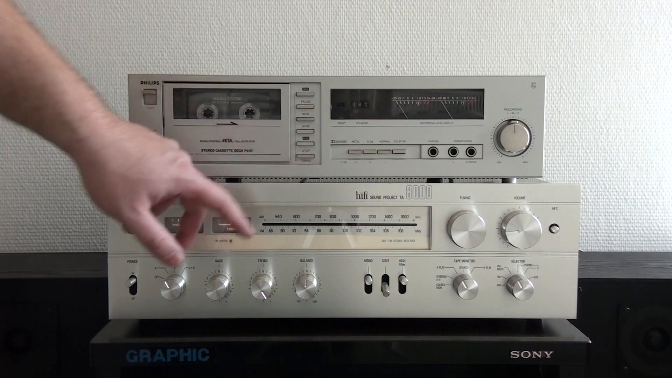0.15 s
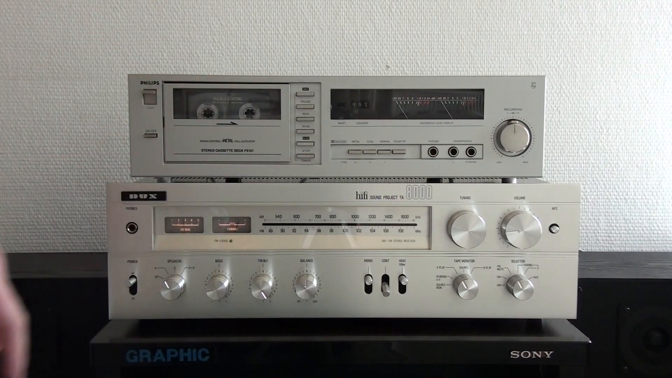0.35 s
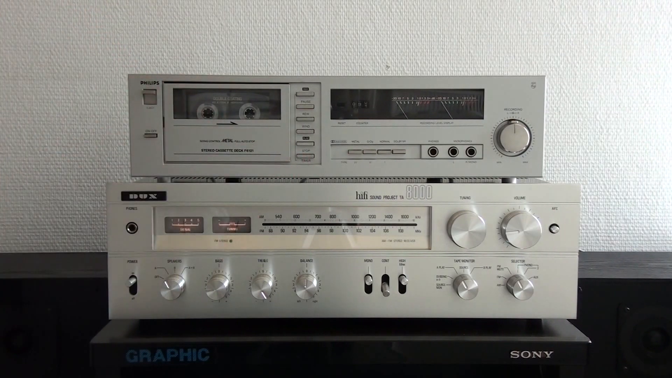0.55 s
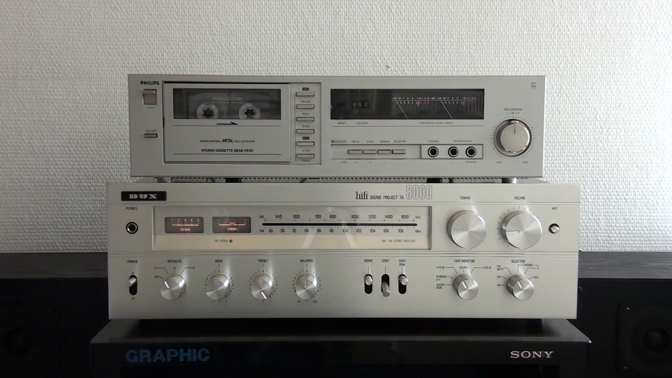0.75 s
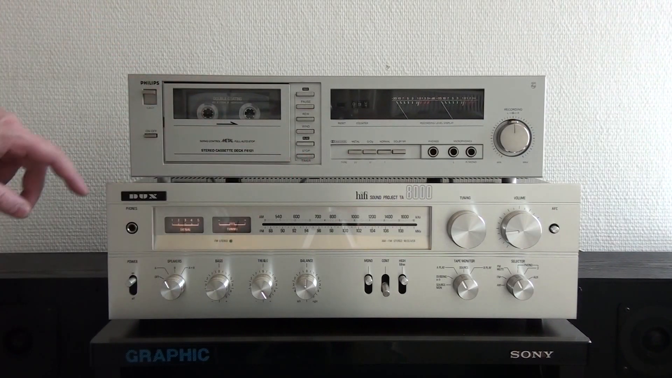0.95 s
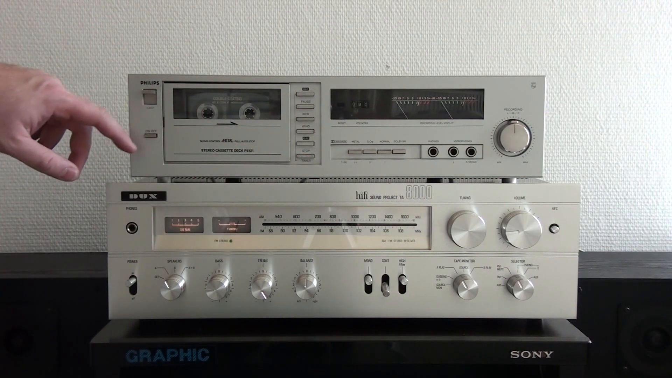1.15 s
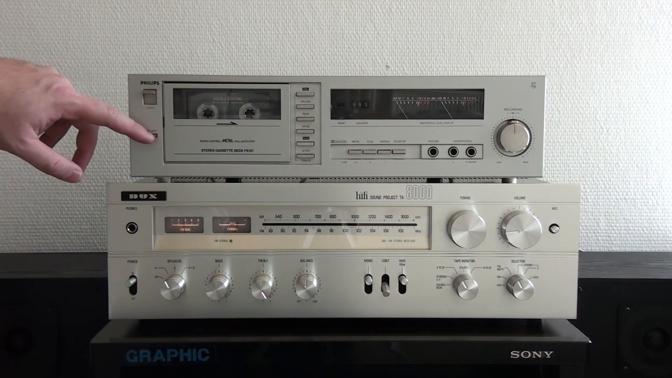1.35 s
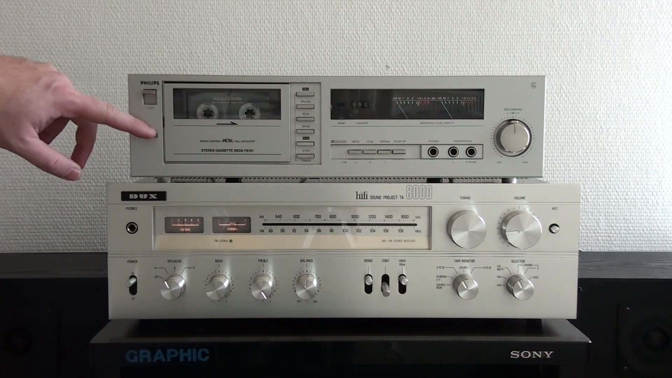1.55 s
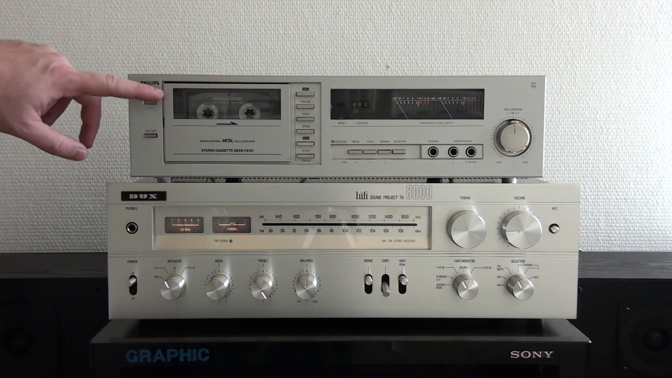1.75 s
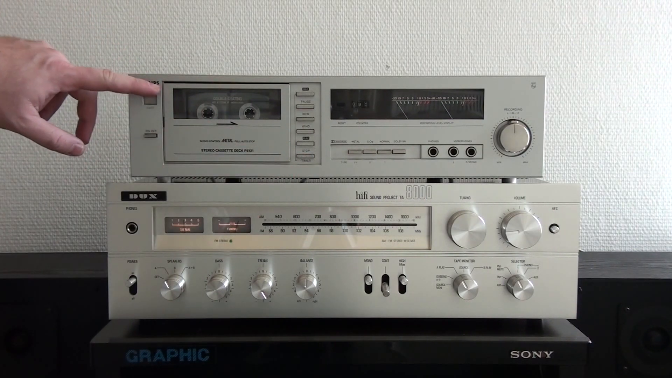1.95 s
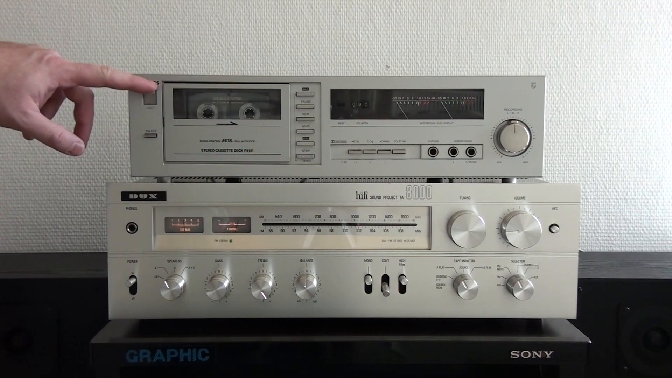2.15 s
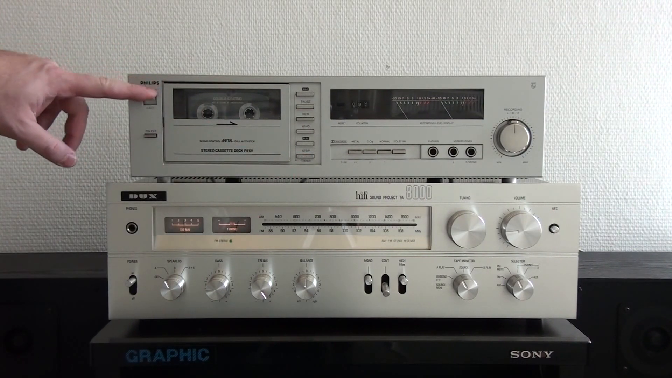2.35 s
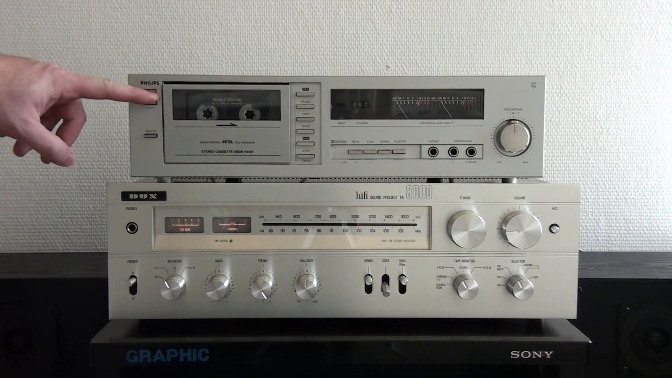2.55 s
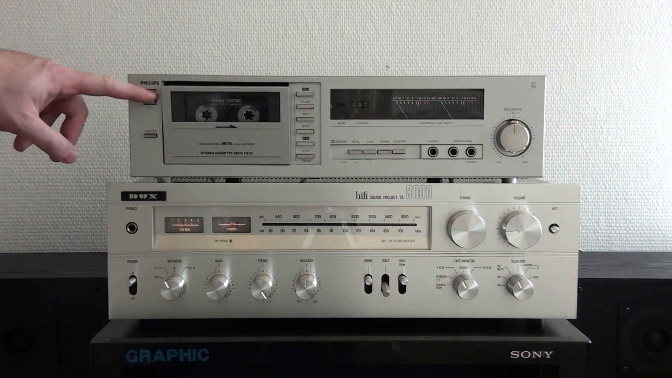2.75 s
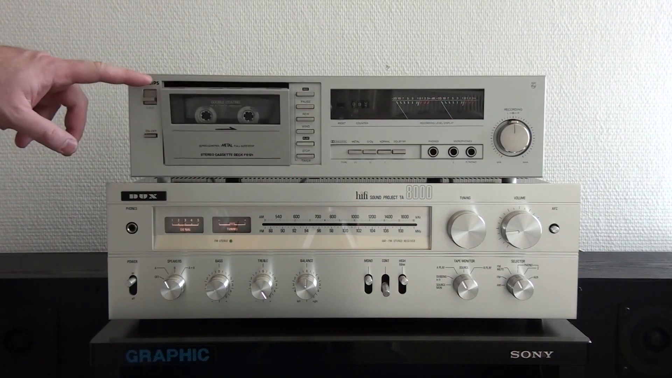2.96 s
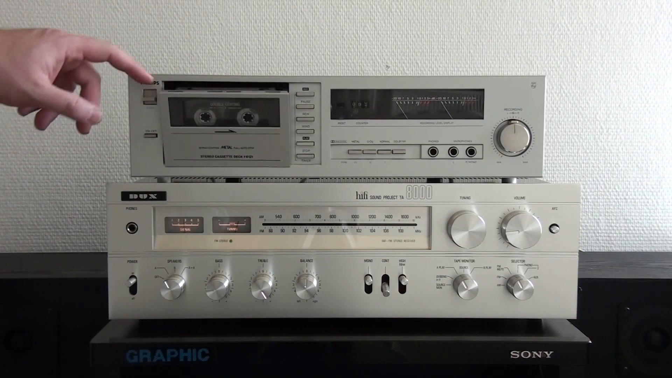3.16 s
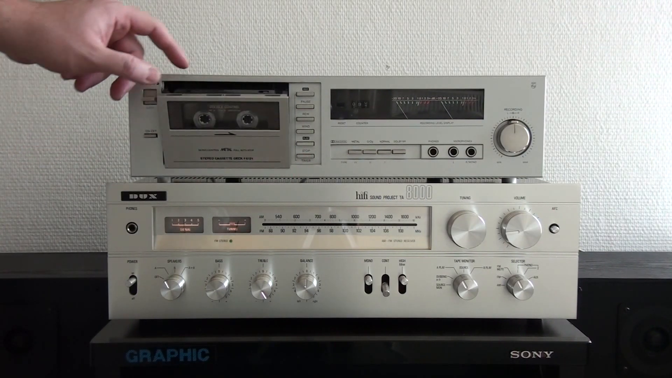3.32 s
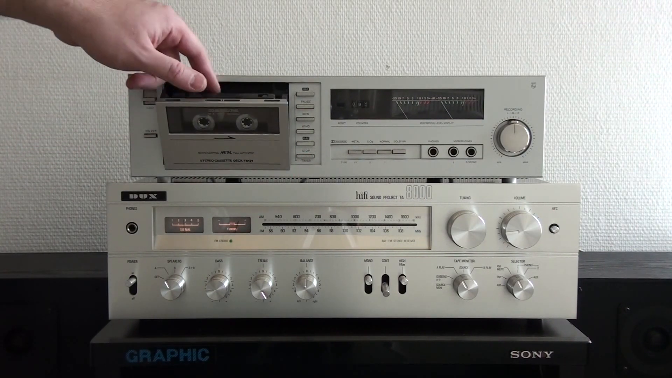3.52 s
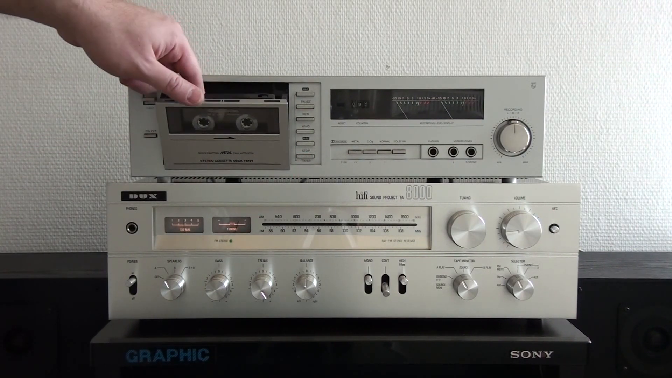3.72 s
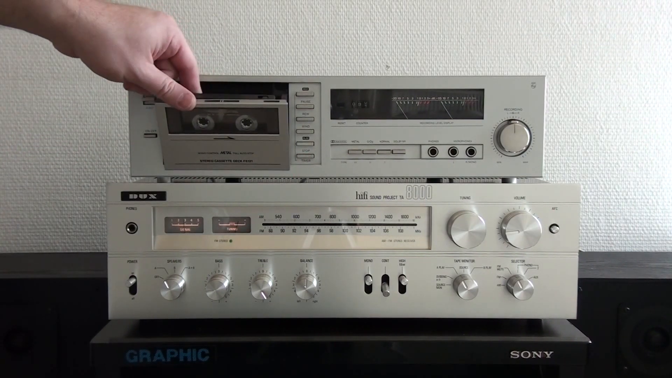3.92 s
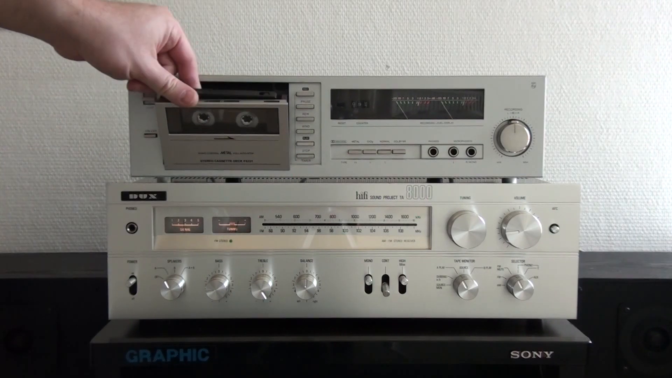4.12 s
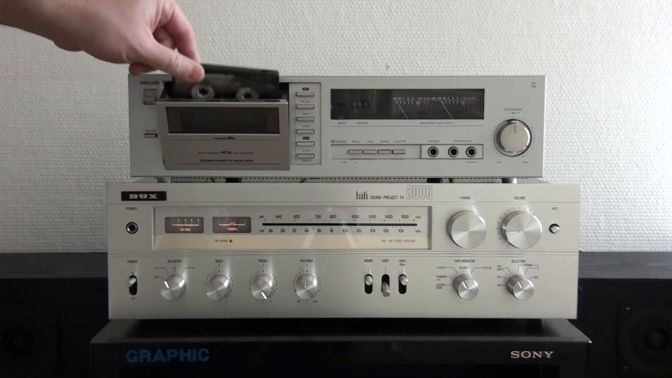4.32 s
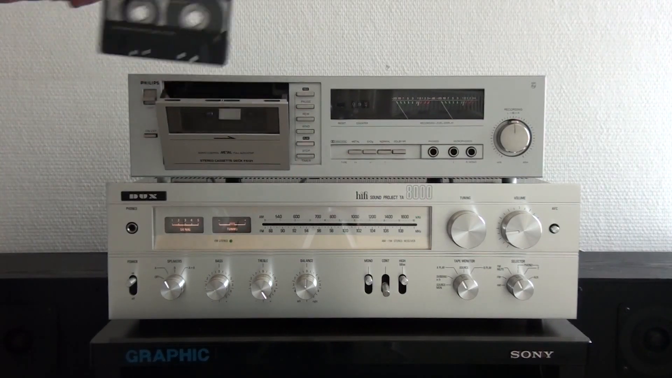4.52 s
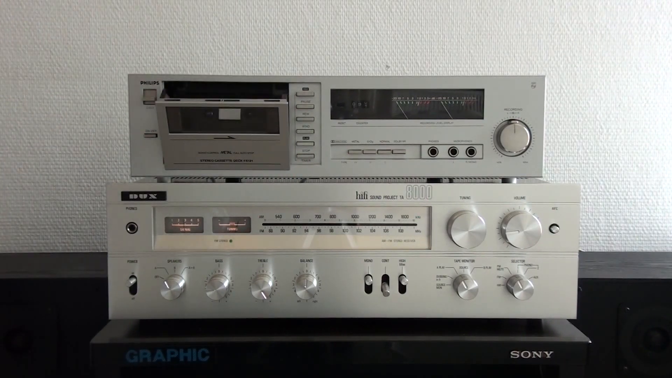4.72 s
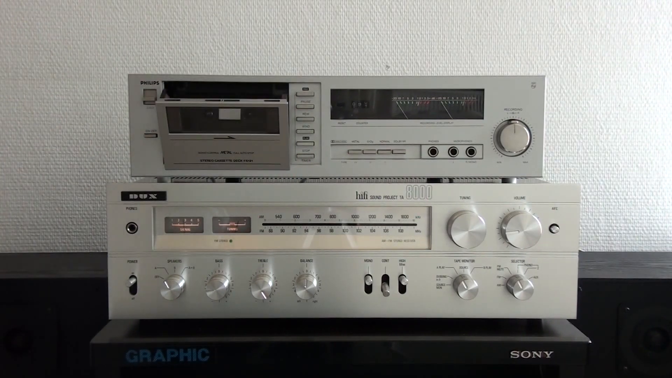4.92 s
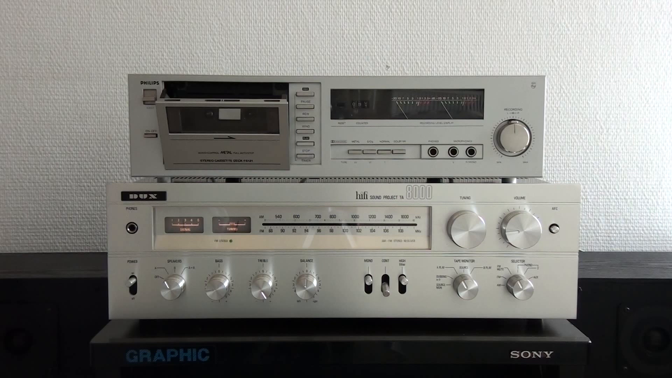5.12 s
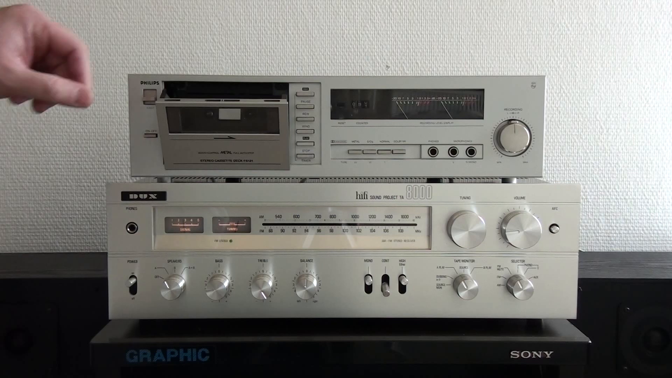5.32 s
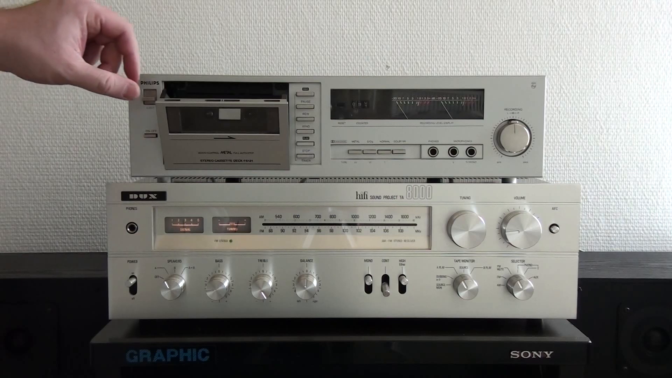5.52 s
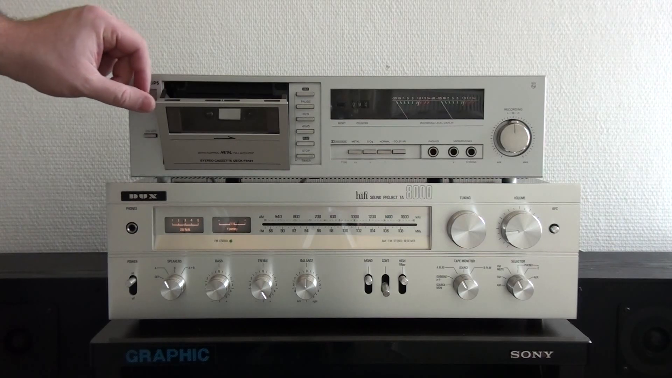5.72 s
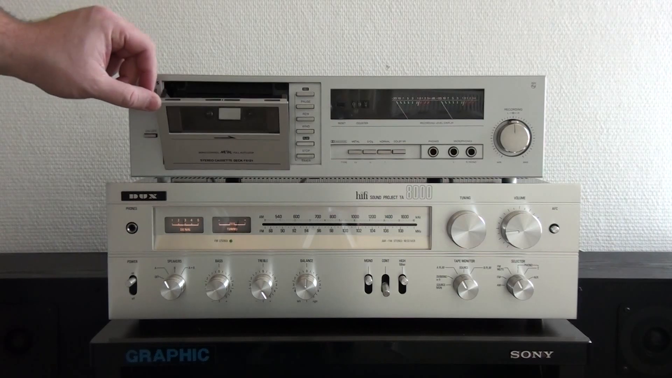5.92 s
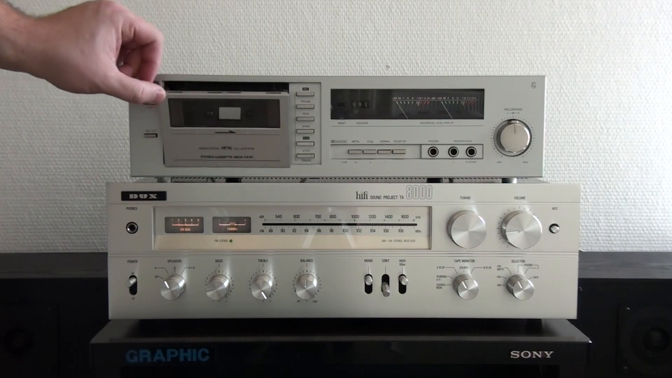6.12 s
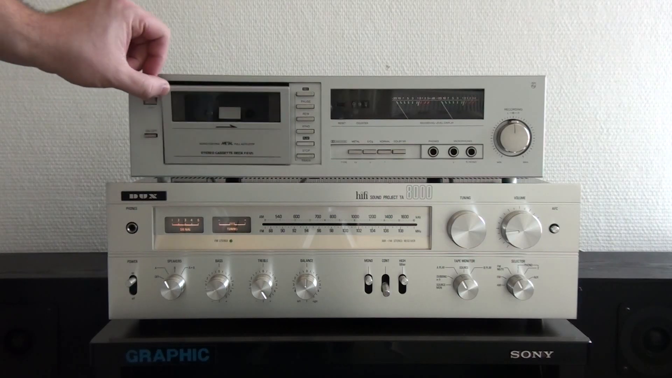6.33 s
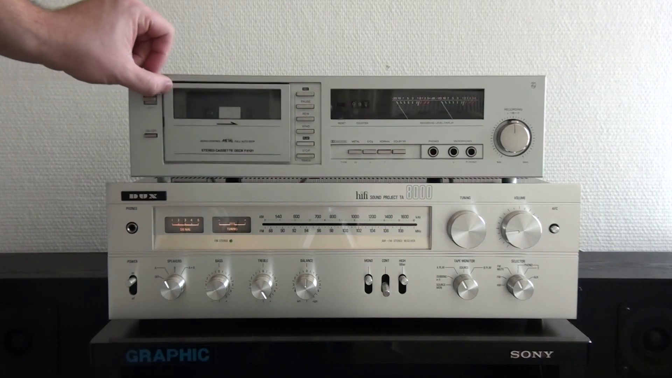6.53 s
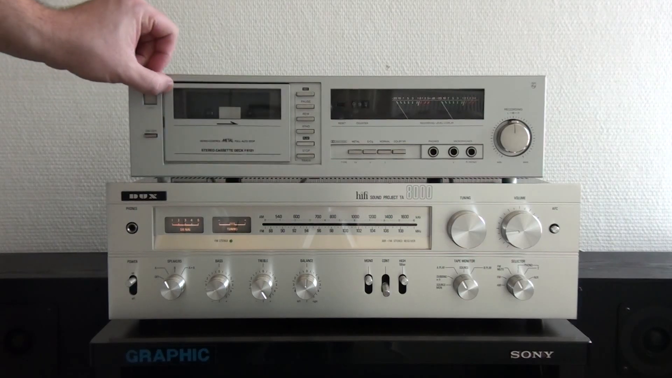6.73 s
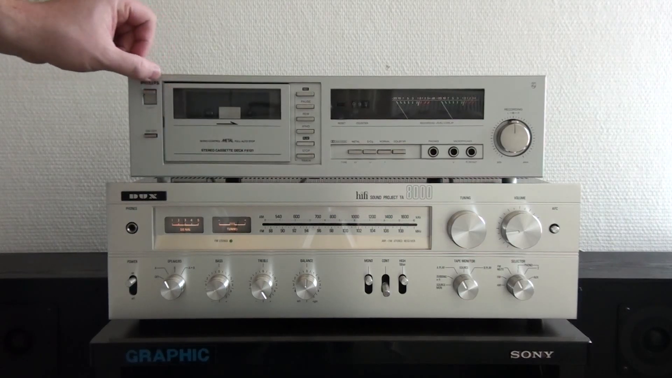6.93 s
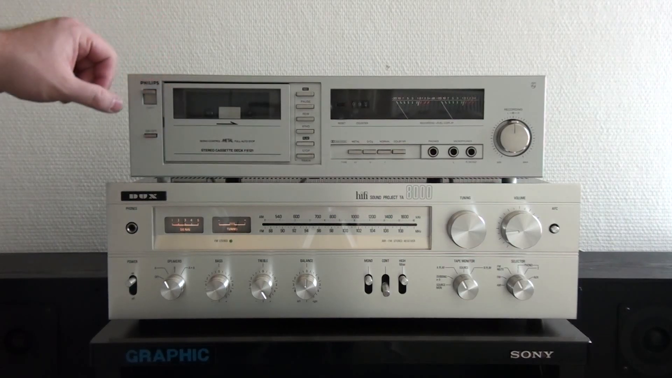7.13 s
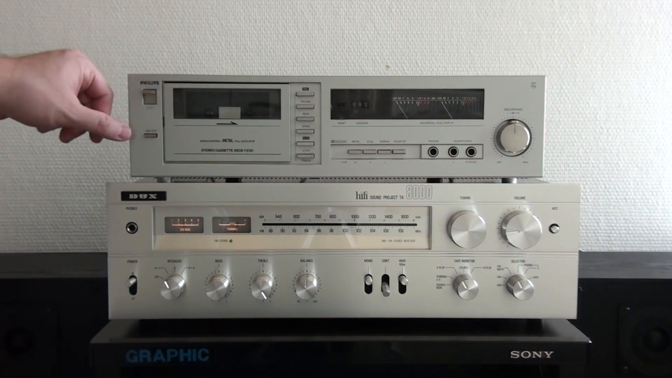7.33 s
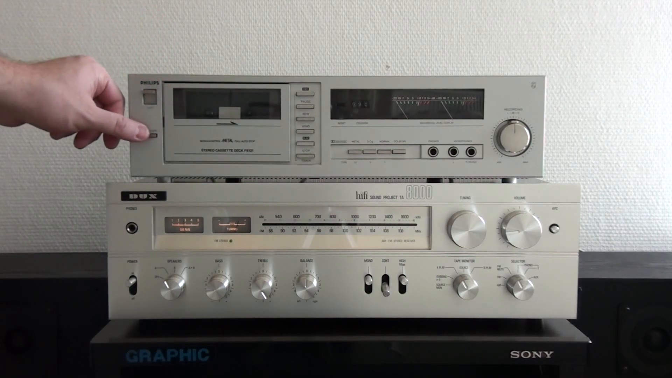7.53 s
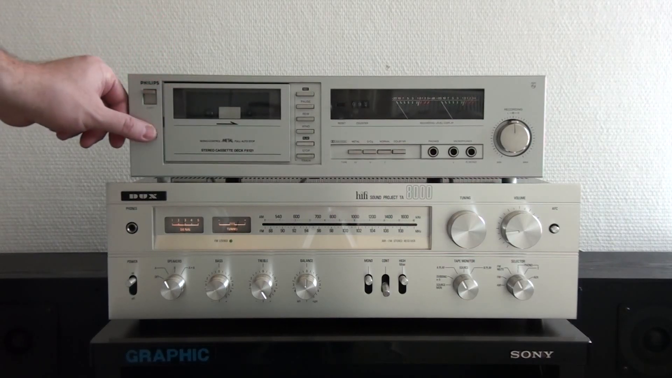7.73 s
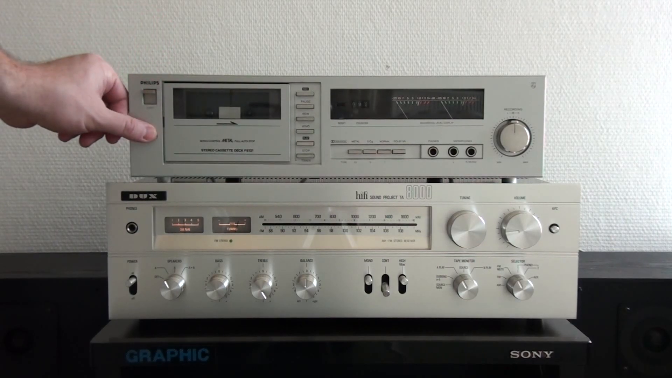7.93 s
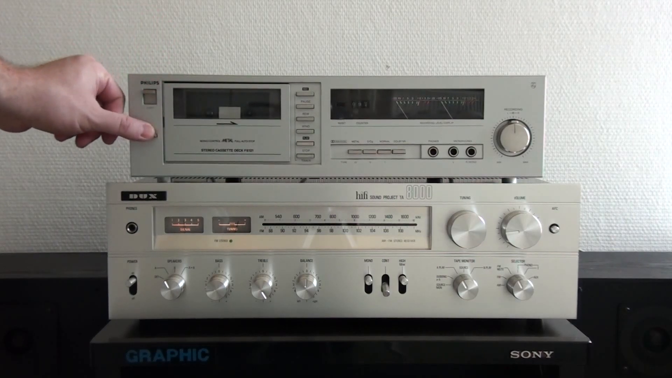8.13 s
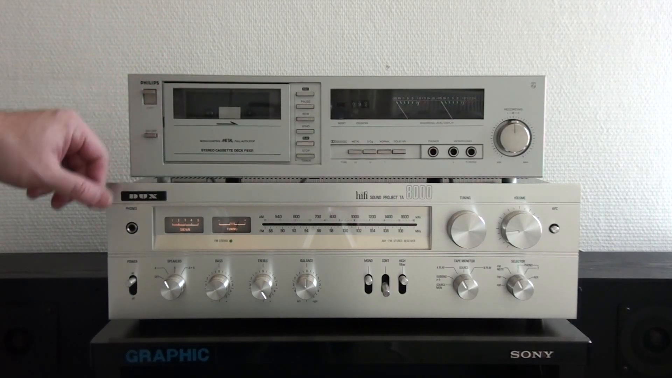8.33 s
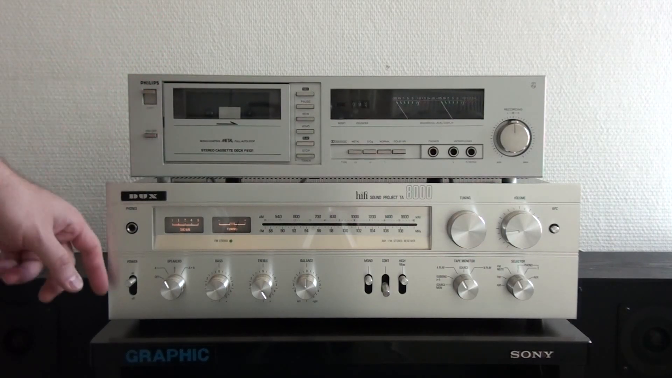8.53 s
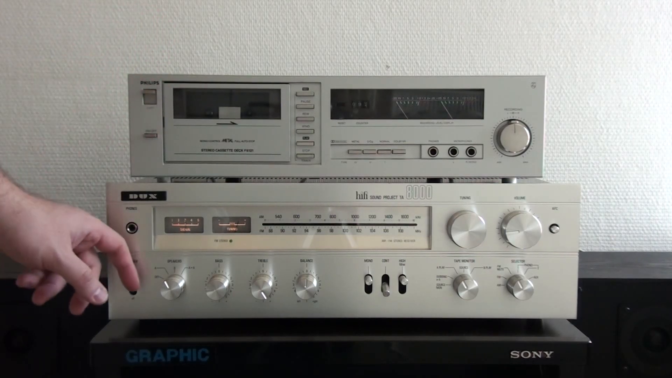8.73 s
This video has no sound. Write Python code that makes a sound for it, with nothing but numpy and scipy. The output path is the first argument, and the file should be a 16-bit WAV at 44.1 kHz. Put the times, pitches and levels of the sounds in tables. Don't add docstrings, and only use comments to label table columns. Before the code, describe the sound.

In a small, lively bare room, about two metres from the microphone, a cassette deck's eject key clicks and its door softly knocks open. A plastic cassette is tapped, scraped free with sharp clacks and laid on a shelf with a double clatter. After a pause the door slams into its latch with a bright springy rattle, then a power switch clicks. Faint hiss and distant fan hum continue throughout.

```python
import sys
import numpy as np
from scipy import signal
from scipy.fft import rfft, irfft
from scipy.io import wavfile
from scipy.ndimage import uniform_filter1d

SR = 44100
rng = np.random.default_rng(int(sys.argv[2]) if len(sys.argv) > 2 else 0)


def persist_wave(psi):
    counts = np.round(np.clip(psi, -1, 1) * 32767).astype(np.int16)
    wavfile.write(sys.argv[1], SR, np.atleast_2d(counts).T)


def convert_level_to_amplitude(level_db):
    exponent = np.asarray(level_db, float) / 20
    return 10 ** exponent


N = 391166


# low/Hz, high/Hz
BANDS_HZ = [(60, 550), (550, 3200), (3200, 7800), (7800, 14000)]
CHASSIS_MODES = [(79.5, 18.7, 14), (206.2, 13.3, 19.5), (497, 38, -3), (860, 90, 5.5), (1370, 94, 13),
                 (1614, 110, 14.5), (1971, 250, 9), (2520, 170, 6), (4790, 1400, -1.5), (8950, 417, -6.5),
                 (11400, 400, -1.5)]


def band(x, lo_hz, hi_hz, order=2):
    return signal.sosfilt(signal.butter(order, [lo_hz, hi_hz], "bandpass", fs=SR, output="sos"), x)


def ring(x, f_hz, width_hz):
    return signal.lfilter(*signal.iirpeak(f_hz, f_hz / width_hz, fs=SR), x)


def body(x, modes):
    return x + sum(convert_level_to_amplitude(db) * ring(x, f_hz, width_hz) for f_hz, width_hz, db in modes)


def unit(x):
    return x / np.sqrt(np.mean(x ** 2))


def tint(x, f_hz, db):
    f = np.maximum(np.arange(len(x) // 2 + 1) * SR / len(x), 1)
    gain = convert_level_to_amplitude(np.interp(np.log(f), np.log(f_hz), db))
    return irfft(rfft(x) * gain, len(x))


def walk(rate_hz):
    hold = int(SR / rate_hz)
    steps = np.repeat(rng.standard_normal(N // hold + 1), hold)
    return unit(uniform_filter1d(uniform_filter1d(steps, hold), hold)[:N])


def hiss_and_murmur():
    # f/Hz, density/dB
    air_spectrum = [(15, -64.5), (25, -3), (114, -9), (1020, -7), (1700, -10), (6050, -17), (11900, -16),
                    (16000, -19.5)]
    # f/Hz, level/dB
    air_side = [(60, -13), (110, -10), (200, -2), (500, 1), (2380, 1.5), (4400, -0.5), (8120, -2.5),
                (15000, -10.5)]
    level_db, hiss_db, murmur_db, swell_db = -68, 0.24, 1.5, 1.1
    rustle_db, rustle_s = 3.5, 0.17
    f_hz, db = np.transpose(air_spectrum)
    mid, side = (tint(rng.standard_normal(N), f_hz, db) for _ in range(2))
    side = tint(side, *np.transpose(air_side))
    noise = convert_level_to_amplitude(level_db) * np.array([mid + side, mid - side]) / np.std(mid)
    low = band(noise, 84, 2600, order=1)
    murmur = convert_level_to_amplitude(murmur_db + swell_db * walk(4.1)) * low
    rustle = convert_level_to_amplitude(rustle_db * np.exp(-np.arange(N) / SR / rustle_s))
    return rustle * (convert_level_to_amplitude(hiss_db) * (noise - low) + murmur)


def far_fan():
    # f/Hz, width/Hz, level/dB
    fan_modes = [(227.7, 63, -73.5), (407.5, 160, -83), (997, 34, -83.5), (1664, 24, -87),
                 (11940, 420, -86)]
    hum = np.zeros(N)
    for f_hz, width_hz, db in fan_modes:
        tone = ring(ring(rng.standard_normal(N), f_hz, width_hz), f_hz, width_hz)
        hum += convert_level_to_amplitude(db + 1.9 * walk(2.2)) * unit(tone)
    return hum


def room(x):
    # f/Hz, t60/s, tail level/dB, side minus mid/dB
    room_bands = [(109, 0.41, -17, -26), (269.6, 0.48, -17.5, -39.5), (590, 0.44, -18.5, -15),
                  (1360, 0.35, -18.5, -13.5), (2833, 0.39, -21, -10.5), (6000, 0.35, -24, -7.5),
                  (10600, 0.3, -23, -7.5), (14000, 0.21, -25, -16)]
    build_ms = 4.5
    t = np.arange(int(0.7 * SR)) / SR
    f_hz = np.array(room_bands)[:, 0]
    edges_hz = np.r_[40, np.sqrt(f_hz[1:] * f_hz[:-1]), 17000]
    build = 1 - np.exp(-(t * 1000 / build_ms) ** 2)
    mid, side = 0, 0
    for (_, t60_s, tail_db, side_db), lo_hz, hi_hz in zip(room_bands, edges_hz, edges_hz[1:]):
        decay = convert_level_to_amplitude(tail_db - 60 * t / t60_s) * build
        tail = decay * band(rng.standard_normal((2, len(t))), lo_hz, hi_hz)
        mid = mid + tail[0]
        side = side + convert_level_to_amplitude(side_db) * tail[1]
    mid, side = (signal.oaconvolve(x, tail)[:N] for tail in (mid, side))
    return mid + side * np.array([[1], [-1]])


def strokes(rows):
    edge_db, ramp_s = -12, 0.016
    gains = np.zeros((3, N))
    for mid_s, length_s, db, heft_db, hard_db in rows:
        at = np.arange(int((mid_s - length_s / 2) * SR), int((mid_s + length_s / 2) * SR))
        off_s = np.abs(at / SR - mid_s)
        swell = np.clip((length_s / 2 - off_s) / ramp_s, 0, 1) * convert_level_to_amplitude(edge_db * 2 * off_s / length_s)
        gains[:, at] += swell * convert_level_to_amplitude(db + np.array([[0], [heft_db], [hard_db]]))
    return gains


def rubs(gains, modes, slips_per_s):
    scatter_db = 1.8
    slips = rng.random(N) < slips_per_s / SR
    slips = slips * convert_level_to_amplitude(scatter_db * rng.exponential(size=N)) * rng.standard_normal(N)
    rung = body(slips, modes)
    bands_hz = (BANDS_HZ[1], BANDS_HZ[0], (3200, 12000))
    return sum(g * unit(band(rung, lo_hz, hi_hz)) for g, (lo_hz, hi_hz) in zip(gains, bands_hz))


def chatter(lags_s, size):
    x = np.r_[1., np.zeros(size - 1)]
    for lag in np.maximum(1, (lags_s * SR).astype(int)):
        loop = np.r_[1., np.zeros(lag - 1), 0.72]
        x = signal.lfilter(loop[::-1], loop, x)
    return x


def knocks(events, modes, share_db):
    contact_s = 0.0026
    room_per_hardness = 0.28
    out = np.zeros((2, N))
    for (t_s, panel_db, heft_db, hard_db, crisp_db), luck in zip(events, rng.random((len(events), 3))):
        lags_s = contact_s * (1 + luck) * [0.03, 0.08, 0.18]
        rung = body(chatter(lags_s, size=6000), modes)
        room_db = share_db + room_per_hardness * hard_db
        levels_db = panel_db + np.array([heft_db, 0, hard_db, hard_db + crisp_db])
        for (lo_hz, hi_hz), db in zip(BANDS_HZ, levels_db):
            part = band(rung, lo_hz, hi_hz, order=3)
            gains = convert_level_to_amplitude(np.array([[db], [db + room_db]]))
            out[:, int(t_s * SR):][:, :len(part)] += gains * part / np.abs(part).max()
    return out


def fingers_rub():
    deck_rubs = [(2.10, .08, -62, 3.5, -5), (2.21, .06, -74, 2, -11), (2.385, 0.065, -49, -1, -10),
                 (2.45, 0.084, -56, 9.5, 3), (2.81, 0.13, -58, 8, -2.5), (3.555, .11, -63.5, 2, 1.2),
                 (5.98, .08, -73, 3, 1), (6.53, 0.087, -57.5, -1, -15), (6.577, 0.051, -49, -4.5, -0.5),
                 (8.69, 0.057, -54, -5, -14), (8.775, 0.034, -73, 3, -8)]
    return convert_level_to_amplitude(-11) * rubs(strokes(deck_rubs), CHASSIS_MODES, 1800)


def power_switch():
    power_contacts = [
        (7.9047, -44, -12.5, 6.1, -1.1),
        (8.096, -46.5, -22, 3.5, -6),
        (8.1245, -40, -12, 3.6, 0.5),
        (8.141, -59, 5.5, 5.4, .1),
    ]
    press_modes = [(488, 32, 2.3), (1590, 170, 5.2), (2610, 145, 11.6), (4800, 520, 3), (6100, 440, 2.5),
                   (9300, 760, 1.6)]
    release_modes = [(504, 84, 4.1), (737, 100, 6.3), (1310, 150, 6.3), (2260, 460, 5), (4970, 1600, 2.7),
                     (9000, 400, 1.8), (11600, 650, 5.1)]
    press = knocks(power_contacts[:1], press_modes, -3.5)
    return press + knocks(power_contacts[1:], release_modes, -4.5)


def door_shut():
    latch_contacts = [
        (5.9696, -51, -7, -7.5, -5),
        (6.4931, -48, -7, -16, 2.5),
        (6.5776, -40, -9.5, -15, 8),
        (6.6066, -37, -21.5, 6, -10),
        (6.6119, -25.5, -19, 14, -0.4),
        (6.6256, -27, -17.5, 10, -4),
    ]
    latch_modes = [(212, 30, 14.4), (1467, 330, 3), (2117, 1100, 2), (4370, 162, 4), (4720, 220, 3),
                   (5340, 380, 3), (6420, 750, 3.9), (9310, 170, 1.03), (10040, 280, 2.8)]
    spring_rattle = [(6.65, .085, -38.5, -9, 9.9)]
    spring_modes = [(205, 29, 2.4), (4300, 130, 15), (4600, 110, 9.6), (4805, 160, 8), (5300, 590, 3.2),
                    (6740, 406, 10), (9900, 230, 6)]
    slam = knocks(latch_contacts, latch_modes, -3.5)
    return slam + rubs(strokes(spring_rattle), spring_modes, 1500)


def cassette_laid():
    lay_contacts = [
        (4.8611, -50.5, -12, -2, -11),
        (4.901, -60, -14, 7, -4),
        (4.9163, -34.5, -36, -4, -.6),
        (4.9468, -51, -22, 6, -11),
        (4.9564, -46, -19, 3, -4),
        (5.0363, -45.5, -18, 10, -1.7),
        (5.0434, -30, -28, -18, .1),
        (5.0505, -31, -27, -24, 6),
    ]
    corner_modes = [(2620, 150, 15), (3170, 91, 4.1), (6730, 2500, 5.3)]
    shelf_modes = [(750, 310, 13), (990, 130, 13), (1223, 73, 17.3), (1390, 140, 16), (1880, 320, 10),
                   (2480, 150, 6.3), (7000, 930, 4.9), (9500, 460, 1)]
    corner = lay_contacts[:2] + lay_contacts[3:6]
    flat = lay_contacts[2:3] + lay_contacts[6:]
    return knocks(flat, shelf_modes, -7.5) + knocks(corner, corner_modes, -7.5)


def draw():
    start_s, grip_s, end_s, ramp_s = 4.24, 4.365, 4.395, 0.014
    level_db, heft_db, hardness_db = -39, -21.5, 10.5
    rise_db_per_s, harden_db_per_s, harden_s = 190, 428, 0.048
    t = np.arange(N) / SR
    fade = np.clip(np.minimum(t - start_s, end_s - t) / ramp_s, 0, 1)
    db = level_db + rise_db_per_s * np.minimum(t - grip_s, 0)
    hard_db = hardness_db + harden_db_per_s * np.clip(t - end_s, -harden_s, 0)
    return fade * convert_level_to_amplitude(np.array([db, db + heft_db, db + hard_db]))


def cassette_pulled():
    pull_contacts = [(3.7718, -56, -11, -14, -3), (3.7806, -48.5, -8, -30, -2.1),
                     (3.8388, -36, -25, -11.5, -21), (3.8546, -48, -5, -22, 3),
                     (3.9041, -38.5, -20.5, -24, 11.5), (4.1592, -52, -4, -20, -5),
                     (4.3131, -42, -9, -23, 1), (4.3421, -33, -26, -19, -4),
                     (4.3617, -29.5, -31, -18, -2.2), (4.3736, -27.5, -16.5, -5, 2.1),
                     (4.3919, -25, -15.5, 6, 0.5), (4.4039, -31.5, -6, -20, 11)]
    loosening = [(4.165, 0.18, -58, -12, -8), (4.24, .06, -65, 7, -16)]
    guide_modes = [(490, 90, 12), (880, 120, 9), (1370, 100, 22), (1500, 130, 19), (2000, 300, 12),
                   (2600, 120, 6), (7600, 180, 4)]
    shell_modes = [(210, 37, 10), (480, 77, 3.3), (1342, 300, 17), (1540, 150, 17), (1910, 160, 9),
                   (2533, 47, 17.5), (3230, 70, 3.4), (4570, 1600, 1.8), (5900, 870, 4.4), (7600, 140, 1),
                   (11660, 110, 1.7)]
    grip = knocks(pull_contacts[:6], guide_modes, -4.5)
    pull = knocks(pull_contacts[6:], shell_modes, -1)
    scrape = rubs(strokes(loosening) + draw(), guide_modes, 600)
    return grip + pull + convert_level_to_amplitude(-11) * scrape


def eject():
    eject_contacts = [
        (2.2664, -50, -9, .6, -15),
        (2.3374, -45, -9, 1.2, 5),
        (2.3804, -37.5, -25, 1.4, 0),
        (2.4272, -43, -17, 1.8, 3.5),
        (2.486, -33, -7.5, -3, -7),
        (2.6007, -44.5, -7, -25, .1),
        (2.6427, -44, -10, -23, -9),
        (2.7415, -45, -27, -1.5, -7.5),
        (2.849, -59.5, -10, 3, 2),
    ]
    hinge_modes = [(217, 43, 9), (840, 46, 25), (960, 53, 27), (1370, 180, 20.5), (2000, 200, 6),
                   (2670, 79, 3.8)]
    key = knocks(eject_contacts[:5], CHASSIS_MODES, -6)
    door = knocks(eject_contacts[5:7], hinge_modes, -6.5)
    key_return = knocks(eject_contacts[7:], CHASSIS_MODES, -1)
    return key + door + key_return


def hand_pan():
    # t/s, left minus right/dB
    hand_place = [(2, 0.5), (4.6, 0.5), (4.8, 5.5), (5.3, 2), (5.8, 1), (8.87, 0.3)]
    pan_db = np.interp(np.arange(N) / SR, *np.transpose(hand_place))
    return convert_level_to_amplitude(np.array([pan_db, -pan_db]) / 2)


def scene():
    background = hiss_and_murmur() + far_fan()
    handling = fingers_rub() + power_switch() + door_shut() + cassette_laid() + cassette_pulled() + eject()
    direct, sent = handling
    hand = (direct + room(sent)) * hand_pan()
    bass_cut = signal.butter(2, 200, "highpass", fs=SR, output="sos")
    return signal.sosfilt(bass_cut, hand) + background


def band_limit(x):
    return signal.sosfilt(signal.butter(12, 16470, fs=SR, output="sos"), x)


def low_pass(x, cut_hz):
    return signal.sosfiltfilt(signal.ellip(10, 0.1, 40, cut_hz, fs=SR, output="sos"), x)


def record(dry):
    mid = low_pass(dry[0] + dry[1], 15800) / 2
    side = low_pass(dry[0] - dry[1], 11600) / 2
    return band_limit(np.array([mid + side, mid - side]))


dry = scene()
out = record(dry)
persist_wave(out)
```